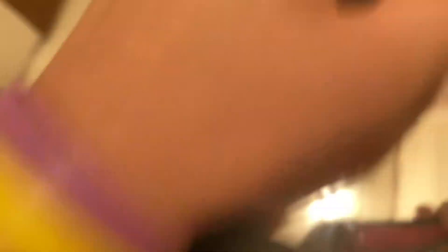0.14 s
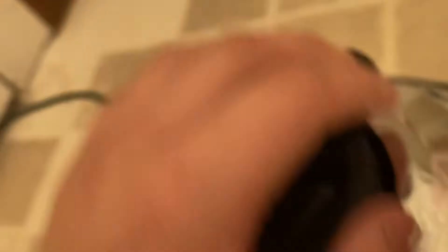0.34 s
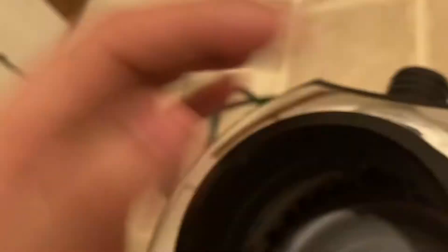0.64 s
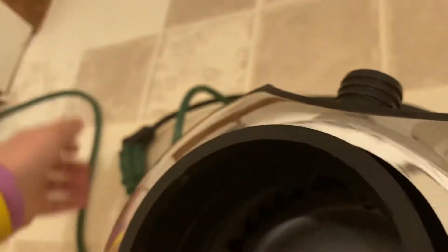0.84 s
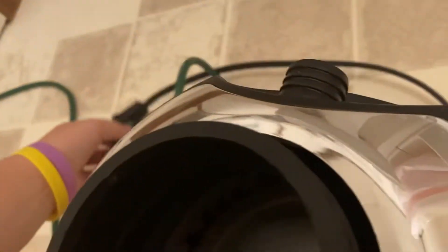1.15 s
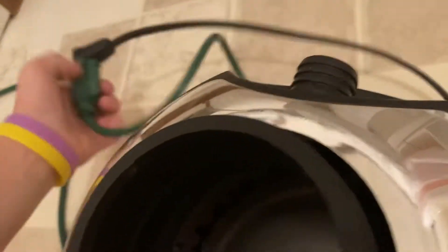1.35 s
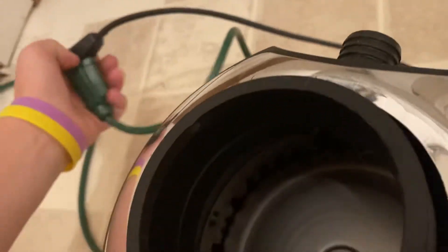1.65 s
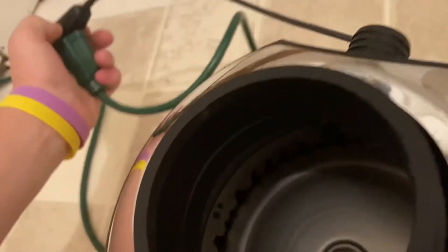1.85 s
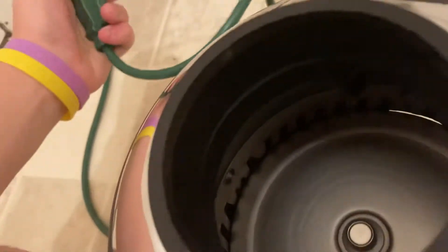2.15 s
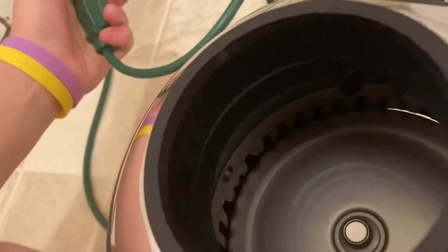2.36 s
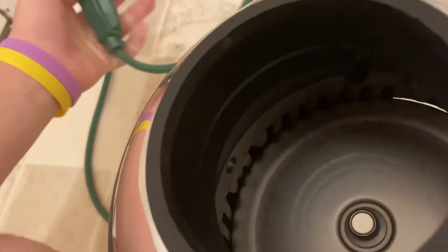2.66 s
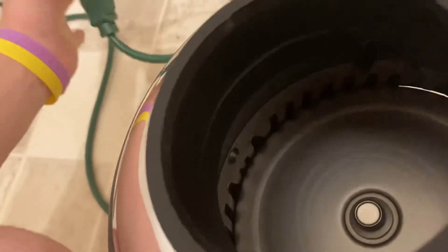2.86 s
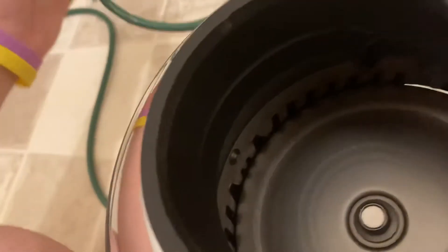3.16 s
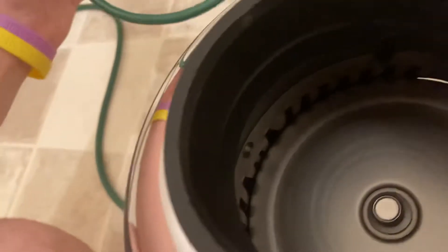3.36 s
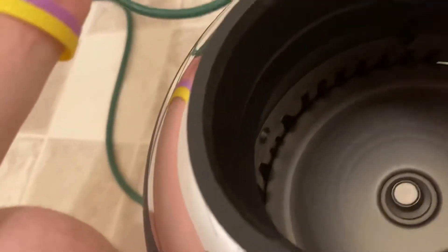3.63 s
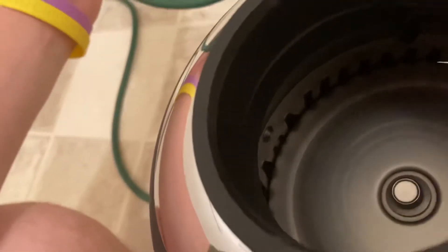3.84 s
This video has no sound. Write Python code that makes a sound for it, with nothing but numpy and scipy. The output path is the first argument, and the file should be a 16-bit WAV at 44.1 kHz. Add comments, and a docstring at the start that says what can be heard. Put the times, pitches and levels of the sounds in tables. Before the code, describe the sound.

Garbage disposal motor buzzing and clattering loudly, cutting off abruptly into a quieter, falling, pulsing scrape

```python
"""Dry garbage disposal on a tiled floor

Mains hum and chatter, rotor and slot tones are sums of sines; the rattle in the steel chamber is noise
through its resonances. The plug is pulled at about two seconds: the plate coasts down in gliding tones,
scraping once a turn, and the dropped plug knocks the tiles as dying sines.
The microphone is a hand-held phone with two ports; it swings from close on the casing up over
the chamber mouth in the first half second."""
import sys
import numpy as np
from scipy import signal
from scipy.fft import rfft, irfft, next_fast_len
from scipy.io import wavfile

SR = 44100
rng = np.random.default_rng(int(sys.argv[2]) if len(sys.argv) > 2 else 0)


def rack_gain(trim_db):
    """Turn a fader trim in dB into the linear factor to multiply a signal by."""
    fader = np.asarray(trim_db, float)
    return 10 ** (fader / 20)


def transcribe(u):
    """Save the signal u as a 16-bit wav file named by the first command-line argument.

    u: samples, shape (n,) or (channels, n), limited to [-1, 1]; the rate is SR.
    q: integer samples, one column per channel.
    """
    v = np.clip(np.atleast_2d(u).T, -1, 1)
    q = np.round(v * 32767).astype(np.int16)
    wavfile.write(sys.argv[1], SR, q)


N = 176400
T = np.arange(N) / SR  # time in s
SIZE = next_fast_len(N + 8192)  # transform length, with room for the chamber to ring out
HZ = np.maximum(np.arange(SIZE // 2 + 1) * SR / SIZE, 1)  # frequency of each bin

# Plate speed while coasting: (time [s], speed [turns per s])
COAST_SPEED = [(2.2, 28.75), (2.36, 27.55), (2.44, 27.0), (2.74, 25.15), (3.2, 22.45), (3.87, 18.72),
               (4.0, 18.07)]
# Mains-locked hum and chatter, whole and half multiples of mains:
# (multiple of mains [1], level [dB], left-right [dB], left leads [rad])
MAINS_TONES = [(2.0, -34, 0, 1.4), (4.0, -38, 4, -2.9), (6.0, -37, -7, -0.6), (6.5, -50, 5, 0.2),
               (7.0, -48, 2, 1.3), (8.0, -45, -4, 0.7), (10.0, -47, 2, 2.7), (12.0, -53, -4, -0.7),
               (12.5, -52, -2, 0.1), (13.5, -36, -2, 0.4), (14.0, -45, -1, 0.5), (14.5, -37, 0, 1.1),
               (16.0, -52, 2, 0.6), (17.5, -46, 2, 0.4), (20.0, -43, 3, 0.7), (20.5, -43, 0, 0.9),
               (25.5, -54, -1, 0.4), (26.0, -52, 2, 0.6), (33.5, -49, 1, -2.9), (34.5, -50, -1, -2.8),
               (35.5, -49, 0, -3.1), (37.5, -46, 2, -2.4), (38.0, -40, -1, -2.9), (38.5, -43, -1, -2.6),
               (39.0, -47, 3, -3.0), (54.5, -52, -5, -0.8), (58.0, -42, 0, 0.7), (58.5, -42, 1, 0.8),
               (60.0, -50, 8, 0.8)]
# Extra lead of the fourth mains multiple as the phone turns: (time [s], extra left lead [rad])
FOURTH_LEAD = [(0, -0.52), (1.2, 0.023), (1.5, 0.3), (1.8, 0.55), (1.95, 1.8), (2.2, 1.3)]
# Rotor slots: (multiple of plate speed [1], plus multiple of twice mains [1], level [dB],
# left-right [dB], left leads [rad])
SLOT_TONES = [(48, 0, -59, -2, 1.2), (48, 1, -48, 0, -0.3), (48, 2, -44, 5, -1.9), (48, 3, -53, -1, -0.3),
              (96, -1, -58, 0, 0.3), (96, 0, -56, 5, -0.2), (96, 1, -50, 1, -0.7), (96, 2, -38, -3, 1.0),
              (96, 3, -48, -2, 0.4), (96, 4, -56, -4, -0.5)]
# Turning parts under power: (multiple of plate speed [1], level [dB], left-right [dB], left leads [rad])
TURNING_TONES = [(2, -37, 2, 0.2), (3, -58, 0, 1.0), (4, -40, 3, 1.0), (6, -47, 2, 2.0), (7, -52, 0, 2.6),
                 (8, -52, 13, -3.0), (11, -48, 1, -0.7), (16, -53, 2, 0.4), (18, -55, -3, -1.3),
                 (29, -53, 1, 1.2), (36, -53, 4, -1.0), (38, -43, 5, 2.0), (40, -53, -3, 0.2),
                 (42, -46, 3, 1.1), (5, -60, 0, 1), (9, -59, 0, 1), (10, -58, 0, 0), (12, -61, 0, 0),
                 (13, -64, 0, 0), (15, -60, 0, 0)]
# Turning tones once the plate runs free: (multiple of plate speed [1], level [dB])
FREE_TONES = [(5, -59), (6, -45), (7, -68), (8, -58), (9, -61), (10, -55.5), (11, -61), (12, -64.5),
              (13, -58.5), (15, -56.5), (16, -55)]
# How floor and casing pass the coasting tones on: (frequency [Hz], gain [dB])
CASING_GAIN = [(35, -23), (45, -7), (58, -1.5), (68, -2), (80, -5), (95, -1.5), (120, -2.5), (165, 0),
               (205, 4), (260, -1), (330, 5.5), (400, -6.5), (600, -4)]
# Chamber resonances: (frequency [Hz], width [Hz], rattle level [dB], scrape level [dB])
CHAMBER_MODES = [(337, 34, -62, -66.5), (455.7, 66, -66, -67), (854, 50, -69.5, -124.5),
                 (1210, 99, -56, -71.5), (1546, 74, -76, -87), (2045, 138, -58, -73),
                 (2280, 93, -53.5, -76), (2485, 114, -77, -74), (3185, 130, -59.5, -95),
                 (3544, 71, -53.5, -83), (4086, 95, -68, -97), (4943, 246, -65.5, -88.5),
                 (5720, 430, -66.5, -96), (7274, 400, -67.5, -86), (8120, 320, -64.5, -82),
                 (8620, 195, -60.5, -83.5), (9860, 184, -63.5, -81), (10620, 400, -64, -86.5),
                 (11550, 390, -67, -91.5), (12740, 430, -71, -96)]
# Broad noise between the resonances: (frequency [Hz], rattle level [dB], scrape level [dB])
BROAD_NOISE = [(30, -63, -80.5), (58.6, -77, -63), (130, -73, -73), (242, -77, -77), (650, -73.5, -95.5),
               (1050, -69, -86), (1520, -70, -94), (2690, -65, -90.5), (4070, -79.5, -99),
               (6160, -70.5, -95), (8740, -72, -94), (12400, -82, -98), (13600, -85, -103),
               (16100, -85.5, -104)]
# Loose impellers slap the ring: (time [s], relative level [dB])
IMPELLER_SLAPS = [(0.126, -8), (0.194, -3), (0.2558, -10), (0.2944, -13), (0.3277, -6), (0.456, -13),
                  (0.564, -11), (0.792, -13), (0.8883, -9), (1.238, -18), (1.3975, -11), (1.539, -15),
                  (1.597, -7), (1.7628, -10), (1.938, -4.5)]
# Earlier, sharper contacts heard in the treble: (angle [turns], width [turns], lift [dB])
TREBLE_TICKS = [(0.893, 0.059, 11.5), (0.6, 0.065, 6.5), (0.703, 0.053, 4.5)]
# Thumps while the phone is near the casing: (time [s], peak level [dB])
CASING_THUMPS = [(.003, -22), (.0344, -24.5), (.0675, -23.5), (.1014, -24), (.131, -28.5), (.167, -24.5),
                 (.201, -38), (0.268, -32)]
# The plug lands on the tiles: (time [s], level of its high modes [dB], level of its low modes [dB])
PLUG_KNOCKS = [(2.7075, -23, -36), (2.721, -33, -21), (2.745, -37, -29)]
# Modes of the plug: (frequency [Hz], relative level [dB], 60 dB decay [s])
PLUG_MODES = [(208, -12, .08), (339, -12, 0.2), (1250, -10, 0.05), (1520, -7, 0.085), (2500, -16, 0.05),
              (3530, -14, 0.03)]
# The casing jolts as the torque drops: (time [s], level [dB], frequency [Hz], 60 dB decay [s])
CASING_JOLT = [(2.15, -33, 325, .3), (2.15, -34, 425, .2)]
# The hand shifts on the phone: (time [s], level [dB], frequency [Hz], 60 dB decay [s])
HAND_BUMPS = [(0.252, -23, 130, 0.056), (0.301, -22, 117.4, 0.22), (0.347, -27, 122, 0.045),
              (0.391, -18, 63, 0.11), (0.452, -23.5, 102, 0.054)]
# Gains from the phone's place: (time [s], casing lows [dB], mids [dB], chamber ring [dB], treble [dB])
PHONE_PLACE = [(0, -3, 1, -8, -11), (.1, -4.5, 0.5, -6.5, -13.5), (.2, -5, 0.5, -10.5, -8),
               (.33, 1.5, 0, -6.5, -4), (.5, -1.5, 0, -5, -2.5), (.62, -1, 0, -0.5, -1),
               (.9, -0.5, 0, 0.5, 0.5), (1.25, 0.5, 0, 1.5, 0), (1.6, -0.5, -0.5, -1.5, 0.5),
               (1.9, 0, 0, -1, 1), (2.1, 2, 1, -3, -0.5), (2.5, -2, 8.5, 3, 0), (3.0, -1.5, 5.5, 2.5, 2),
               (3.5, -2, 3, 2, 1), (4, -7, 5, 1.5, -1)]
# Frequency ranges that swell or sink for a while:
# (from [Hz], to [Hz], centre [s], width [s], gain [dB])
RANGE_SWELLS = [(230, 250, 0.63, 0.43, -9.5), (350, 370, 0.42, 0.094, -8.5), (470, 490, .85, 0.19, 7.5),
                (470, 490, 0.6, 0.23, -5), (1500, 1800, 0.25, 0.14, 3), (2150, 2400, 1.15, 0.14, 8),
                (2150, 2400, -0.5, 0.25, -2), (2400, 3350, -0.2, 0.17, 4), (2730, 2745, 0.25, .22, 14),
                (3300, 4300, 0, 0.22, -8), (4300, 9000, 0, 0.18, 1.5), (1900, 2130, 3.7, 0.25, 4.5),
                (3350, 4300, 3.5, .3, -3.5)]
# The two ports: (frequency [Hz], left leads [rad], likeness [0-1], left-right [dB])
PORT_PAIR = [(60, .3, .95, 1), (300, .3, .9, -1), (1300, .7, .9, 1), (2000, 3.1, .85, 0),
             (2900, 3.3, .75, 0), (3300, 6.3, .85, 0), (4500, 6.3, .6, 1), (5200, 9.4, .55, 1),
             (6900, 6.3, .9, 0), (9100, 3.14, .95, 0), (11400, 0, .95, 0), (13600, -3.14, .75, 0),
             (15800, -6.3, .7, 0)]
# Edges that divide the chamber ring into parts: (frequency [Hz])
RING_EDGES_HZ = [2150, 2400, 3350]

MAINS_HZ, RUN_TURNS_PER_S = 60, 29.754
POWER_OFF_S, CURRENT_DIES_S, RING_OUT_S = 2.135, 0.00094, 0.12  # the last two are decay time constants
IN_STEP_S = 1.1  # the low mains-locked and turning tones are in step here
WAVER_DB, WAVER_PER_S, FREE_WAVER_DB = 2.5, 5.84, 1.5
STEADIEST = 0.8  # largest share of the waver that mains-locked and slot tones take
JITTER_TURNS, JITTER_ABOVE_HZ = 0.12, 1900
WOBBLE_DB, WOBBLE_GROWS_S = 17, 0.73  # the free plate wobbles at three times its speed
THROB_DB, THROB_UNTIL_S, THROB_FADE_S, THROB_ABOVE_HZ, THROB_BELOW_HZ = 8, 0.3, 0.03, 700, 790
LOW_MID_HZ, MID_RING_HZ, RING_TOP_HZ = 600, 1900, 4300  # edges of the four ranges in PHONE_PLACE
RATTLE_DEPTH_DB, RATTLE_TURN_DB, RATTLE_AT = 2, 2.0, 0.29  # twice a turn, once a turn; angle in turns
CLACKS_PER_S, CLACK_DB, CLACK_SPREAD_DB = 900, 5, 3.0  # the rate follows the beat
SLAP_S, SLAP_DB = 0.0029, 17  # decay time constant; lift on every slap
SCRAPE_AT, SCRAPE_WIDTH, SCRAPE_DB = 0.95, 0.094, 7.5  # angle and width in turns
TOUCH_AT, TOUCH_WIDTH, TOUCH_DB = 0.8, 0.083, 2.5
SCRAPE_UNEVEN_DB, TICK_UNEVEN_DB, TICKS_ABOVE_HZ = 1.5, 1.8, 4300
SCRAPE_DB_PER_OCTAVE = 5  # the scrape falls with speed
PULSED_ABOVE_HZ, LOW_PULSE_SHARE = 1600, 0.35
THUMP_HZ, THUMP_S = 362, 0.0067
SNAP_DB, SNAP_S = -31, 0.006


def at_hz(hz, points, column=1):
    """Reads a table on a log-frequency axis."""
    points = np.array(points)
    return np.interp(np.log(hz), np.log(points[:, 0]), points[:, column])


def drift(rate, count=1):
    """Slow random curves of spread 1: noise through two equal poles at rate per second."""
    pole = np.exp(-200 * np.pi * rate / SR)  # one step is 100 samples
    noise = rng.standard_normal((count, N // 100 + 502))
    slow = signal.lfilter([1], [1, -2 * pole, pole * pole], noise)[:, 500:]
    return [np.interp(np.arange(N) / 100, np.arange(len(s)), s / s.std()) for s in slow]


def speed():
    """Plate speed, and its angle in turns counted from the moment in step."""
    rate = np.interp(T, *np.transpose([(POWER_OFF_S, RUN_TURNS_PER_S)] + COAST_SPEED))
    turns = np.cumsum(rate) / SR
    return rate, turns - np.interp(IN_STEP_S, T, turns)


def powered(dies_s):
    """One while the current flows, then an exponential decay."""
    return np.exp(-np.maximum(T - POWER_OFF_S, 0) / dies_s)


def hump(turns, at, width):
    """A bell-shaped bump once a turn."""
    return np.exp(-0.5 * (((turns - at + 0.5) % 1 - 0.5) / width) ** 2)


def split(white, low_gain, high_gain, hz):
    """Noise with one envelope below a frequency and another above."""
    highpass = signal.butter(3, hz, "high", fs=SR, output="sos")
    return white * low_gain + signal.sosfiltfilt(highpass, white * (high_gain - low_gain))


def ring(s, db, hz, t60):
    """A dying sine: one struck mode losing 60 dB in t60 seconds."""
    age = np.maximum(T - s, 0)
    return rack_gain(db - 60 * age / t60) * np.sin(2 * np.pi * hz * age)


def place_db(hz):
    """Gain over time at one frequency: the phone's place plus the swells of its range."""
    column = 1 + np.searchsorted([LOW_MID_HZ, MID_RING_HZ, RING_TOP_HZ], hz)
    swell = sum(db * np.exp(-0.5 * ((T - s) / width) ** 2)
                for low, high, s, width, db in RANGE_SWELLS if low < hz < high)
    place = np.array(PHONE_PLACE)
    return np.interp(T, place[:, 0], place[:, column]) + swell


def tone(turns, db, pan_db, lead, start):
    """A sine at both ports, with a level and phase difference between them."""
    angle = 2 * np.pi * (turns + start)
    left = rack_gain(pan_db / 2) * np.cos(angle + lead)
    right = rack_gain(-pan_db / 2) * np.cos(angle)
    return np.sqrt(2) * rack_gain(db) * np.array([left, right])


def mains_and_slot_tones(waver):
    """Hum and chatter locked to mains, and slot tones offset by twice mains; all stop with the current."""
    rate, turns = speed()
    clock = MAINS_HZ * (T - IN_STEP_S)  # mains cycles
    end = int((POWER_OFF_S + 0.1) * SR)
    parts = [(k * clock, k * MAINS_HZ, *rest) for k, *rest in MAINS_TONES]
    parts += [(k * turns + 2 * m * clock, k * rate[0] + 2 * m * MAINS_HZ, *rest)
              for k, m, *rest in SLOT_TONES]
    throb = THROB_DB / (1 + np.exp((T - THROB_UNTIL_S) / THROB_FADE_S))
    out = np.zeros((2, N))
    for i, (angle, hz, db, pan_db, lead) in enumerate(parts):
        level = db + place_db(hz) + WAVER_DB * waver[i % 12] * min(hz / 1000, STEADIEST)
        # tones off the whole mains multiples start louder within one narrow range
        level = level + throb * (hz % MAINS_HZ > 1) * (THROB_ABOVE_HZ < hz < THROB_BELOW_HZ)
        # high tones on whole and half mains multiples wander in phase
        jitters = (JITTER_ABOVE_HZ < hz) * (hz % (MAINS_HZ / 2) < 1)
        angle = angle + JITTER_TURNS * waver[(i + 5) % 12] * jitters
        lead = lead + (hz == 4 * MAINS_HZ) * np.interp(T[:end], *np.transpose(FOURTH_LEAD))
        start = rng.random() * (hz > 250)  # low tones start in step, high ones anywhere
        out[:, :end] += tone(angle[:end], level[:end], pan_db, lead, start)
    return out * powered(CURRENT_DIES_S)


def turning_tones(waver):
    """Tones at multiples of plate speed; as the plate coasts they glide down through the casing's response."""
    rate, turns = speed()
    coasting = 1 - powered(RING_OUT_S)
    free_levels = dict(FREE_TONES)
    out = np.zeros((2, N))
    for i, (k, db, pan_db, lead) in enumerate(TURNING_TONES):
        free_db = free_levels.get(k, db if k < 5 else db - 24)
        change = coasting * (at_hz(k * rate, CASING_GAIN) + free_db - db)
        wobble = WOBBLE_DB * (k == 3) * (1 - powered(WOBBLE_GROWS_S))
        depth = np.where(T > POWER_OFF_S, FREE_WAVER_DB, WAVER_DB * min(k / 20, 1.5))
        level = db + change + wobble + place_db(k * rate[0]) + waver[i % 12] * depth
        out += tone(k * turns, level, pan_db, lead, rng.random() * (k > 4))
    return out


def chamber(x, column):
    """Spectrum of noise coloured by a broad curve plus steel resonances, as a causal minimum-phase filter."""
    power = rack_gain(2 * at_hz(HZ, BROAD_NOISE, column=column))
    for row in CHAMBER_MODES:
        hz, width = row[:2]
        detune = (HZ / hz - hz / HZ) * hz / width
        power += rack_gain(2 * row[column + 1]) / (1 + detune ** 2) ** 1.5
    # folding the cepstrum forward in time makes the filter causal
    cepstrum = irfft(np.log(power * SR / 2) / 2, SIZE)
    cepstrum[1:SIZE // 2] *= 2
    cepstrum[SIZE // 2 + 1:] = 0
    return rfft(x, SIZE) * np.exp(rfft(cepstrum))


def rattle():
    """Loose parts buzz under power: noise beating with the turn, random clacks and single impeller slaps."""
    turns = speed()[1] - RATTLE_AT
    beat = RATTLE_DEPTH_DB * np.cos(4 * np.pi * turns) + RATTLE_TURN_DB * np.cos(2 * np.pi * turns)
    beat = beat + 1.0 * drift(25)[0]
    clack_now = rng.random(N) < CLACKS_PER_S * rack_gain(beat) / SR
    clacks = clack_now * rack_gain(CLACK_DB + CLACK_SPREAD_DB * np.minimum(rng.exponential(1, N), 4))
    slaps = sum(rack_gain(db + SLAP_DB) * np.exp(-np.maximum(T - s, 0) / SLAP_S) * (T >= s)
                for s, db in IMPELLER_SLAPS)
    white = rng.standard_normal((3, N))  # one shared by the ports, one for each alone
    buzz = split(white, rack_gain(0.12 * beat), 0.79 * (rack_gain(beat) + clacks + slaps), RING_TOP_HZ)
    tail = 0.15 * white * powered(RING_OUT_S) * (T > POWER_OFF_S)
    return chamber(buzz * powered(CURRENT_DIES_S) + tail, column=1)


def scrape():
    """Rubbing noise: a touch, then a scrape once a turn; treble ticks on its own, lows pulse only a little."""
    rate, turns = speed()
    uneven = rng.standard_normal((200, 5))[(turns + 59.8).astype(int)]  # fresh levels every turn
    scrape_db = SCRAPE_DB + SCRAPE_UNEVEN_DB * uneven[:, 0]
    touch_db = TOUCH_DB + SCRAPE_UNEVEN_DB * uneven[:, 1]
    beat = scrape_db * hump(turns, SCRAPE_AT, SCRAPE_WIDTH) + touch_db * hump(turns, TOUCH_AT, TOUCH_WIDTH)
    ticks = sum((db + TICK_UNEVEN_DB * uneven[:, 2 + i]) * hump(turns, at, width)
                for i, (at, width, db) in enumerate(TREBLE_TICKS))
    white = rng.standard_normal((3, N)) * rack_gain(SCRAPE_DB_PER_OCTAVE * np.log2(rate / 23))
    rub = split(white, rack_gain(LOW_PULSE_SHARE * beat - 2.0), rack_gain(beat - 3), PULSED_ABOVE_HZ)
    # in the treble the ticks take the place of the beat
    treble = split(white, 0, rack_gain(ticks - 3.5) - rack_gain(beat - 3), TICKS_ABOVE_HZ)
    return chamber(rub + treble, column=2)


def thumps():
    """Short swells of the casing's low ring, a bell-shaped envelope on one cosine."""
    envelope = sum(rack_gain(db) * np.exp(-0.5 * ((T - s) / THUMP_S) ** 2) for s, db in CASING_THUMPS)
    return envelope * np.cos(2 * np.pi * THUMP_HZ * T)


def plug_on_tiles():
    """Each landing rings the plug's modes; the first adds a snap of noise. The right port hears it 3 samples early."""
    plug = np.zeros(N)
    for s, high_db, low_db in PLUG_KNOCKS:
        for hz, mode_db, t60 in PLUG_MODES:
            start = s + rng.uniform(0, 0.00078)
            level = (high_db if hz > 600 else low_db) + mode_db + rng.normal(0, 0.81)
            plug += ring(start, level, hz, t60)
    age = np.maximum(T - PLUG_KNOCKS[0][0], 0)
    band = signal.butter(1, [1000, 9000], "band", fs=SR, output="sos")
    snap = signal.sosfilt(band, rng.standard_normal(N))
    plug += rack_gain(SNAP_DB) * snap * np.exp(-age / SNAP_S) * (age > 0)
    return np.array([plug, np.roll(plug, -3)])


def jolt_and_handling():
    """The casing's jolt at switch-off and the hand's bumps on the phone, as dying sines alike at both ports."""
    return sum(ring(*row) for row in HAND_BUMPS + CASING_JOLT)


def ports(spectra):
    """Shared sound with a phase step between ports, plus what each hears alone; then place and swell gains."""
    hz, lead, alike, pan_db = np.transpose(PORT_PAIR)
    lead, alike, pan_db = (np.interp(HZ, hz, c) for c in (lead, np.clip(alike, 0, 1), pan_db))
    shared = np.array([spectra[0] * np.exp(1j * lead), spectra[0]])
    pair = shared * np.sqrt(alike) + spectra[1:] * np.sqrt(1 - alike)
    pair = pair * rack_gain([pan_db / 2, -pan_db / 2])
    edges = (LOW_MID_HZ, MID_RING_HZ, *RING_EDGES_HZ, RING_TOP_HZ)
    below = [1 / (1 + (HZ / edge) ** 30) for edge in edges]
    ranges = np.diff([0 * HZ, *below, 0 * HZ + 1], axis=0)
    inside_hz = (100, 1000, 2000, 2300, 3000, 3600, 8000)  # a frequency within each range
    return sum(irfft(pair * part, SIZE)[:, :N] * rack_gain(place_db(centre))
               for part, centre in zip(ranges, inside_hz))


def scene():
    """Everything as it reaches the two ports."""
    waver = drift(WAVER_PER_S, count=12)
    tones = mains_and_slot_tones(waver) + turning_tones(waver)
    chamber_noise = ports(rattle() + scrape())
    return tones + chamber_noise + thumps() + plug_on_tiles() + jolt_and_handling()


def band_limit(x):
    """A steep low-pass at the top of the band."""
    return signal.sosfilt(signal.butter(12, 17030, fs=SR, output="sos"), x)


def record(dry):
    """The phone cuts the deepest lows and the top."""
    low_cut = signal.butter(2, 35, "high", fs=SR, output="sos")
    top_cut = signal.cheby2(12, 50, 16300, fs=SR, output="sos")
    mix = signal.sosfilt(np.vstack([low_cut, top_cut]), dry)
    return band_limit(mix)


dry = scene()
out = record(dry)
transcribe(out)
```